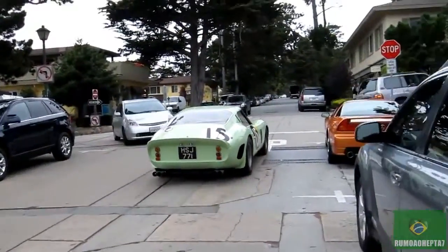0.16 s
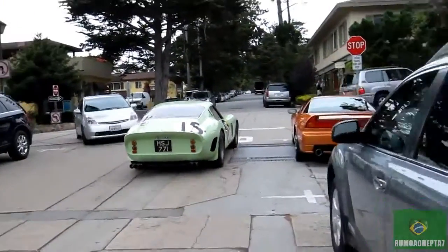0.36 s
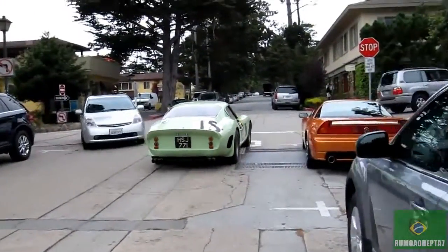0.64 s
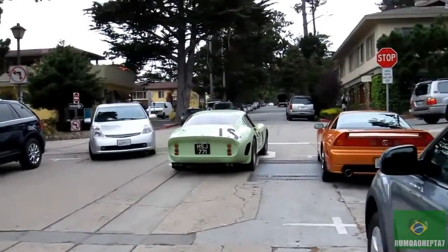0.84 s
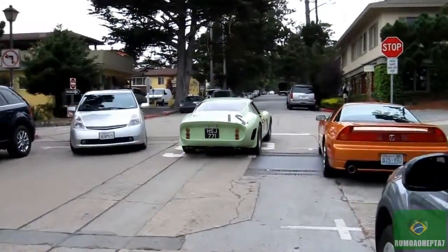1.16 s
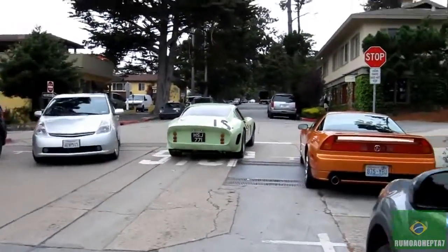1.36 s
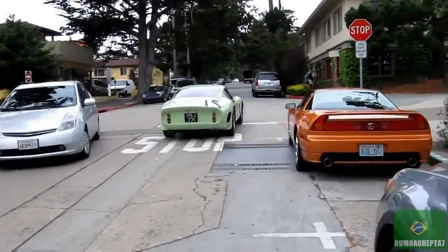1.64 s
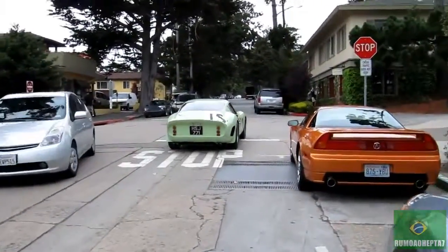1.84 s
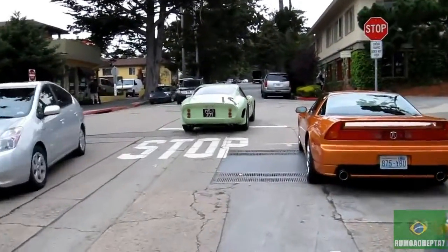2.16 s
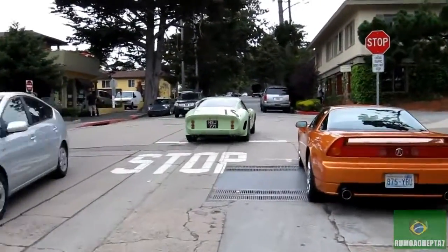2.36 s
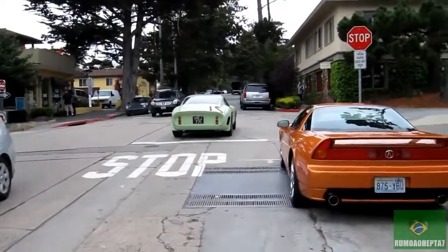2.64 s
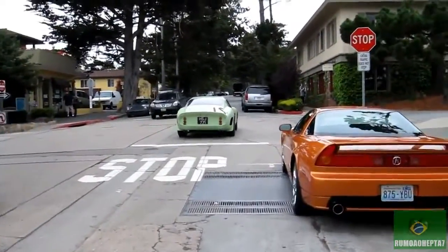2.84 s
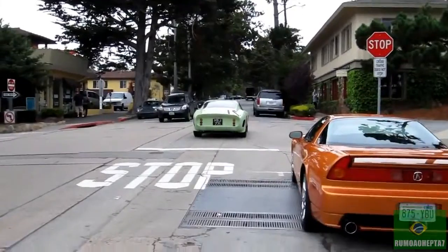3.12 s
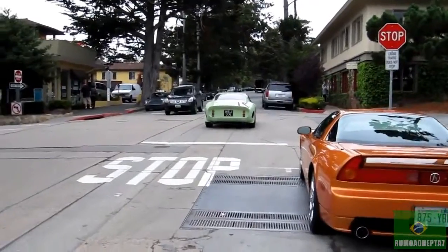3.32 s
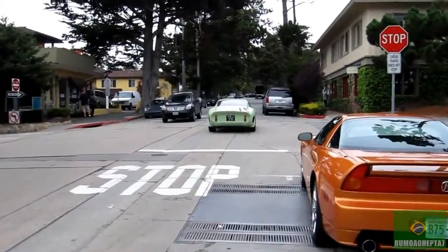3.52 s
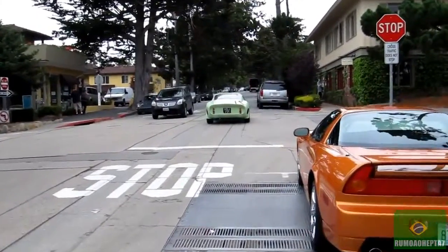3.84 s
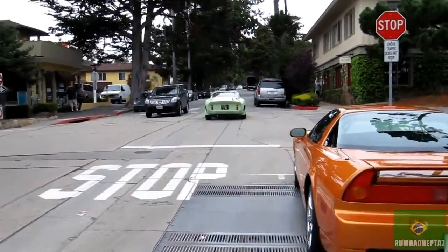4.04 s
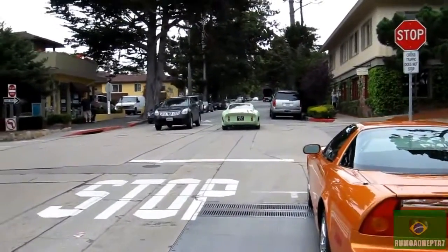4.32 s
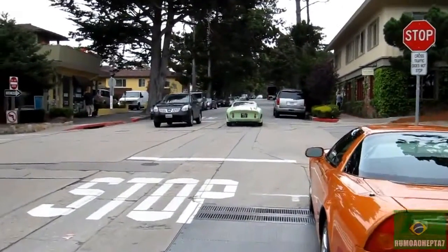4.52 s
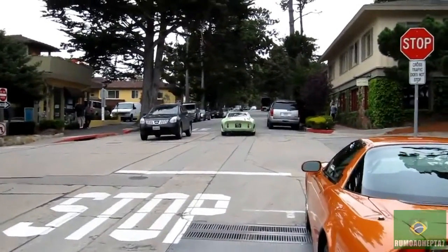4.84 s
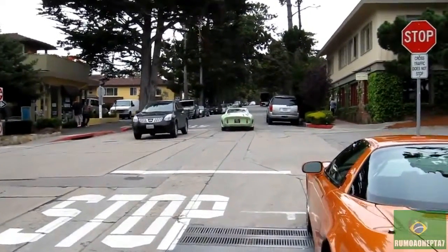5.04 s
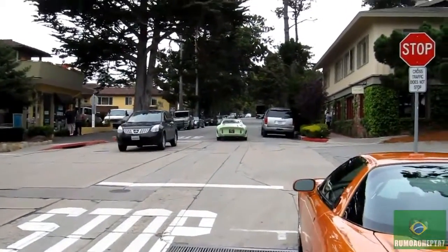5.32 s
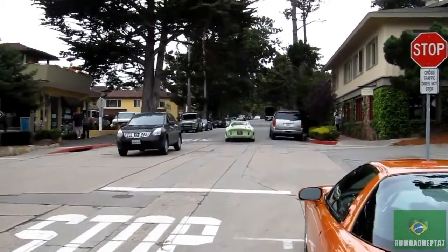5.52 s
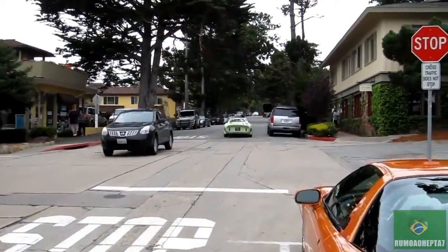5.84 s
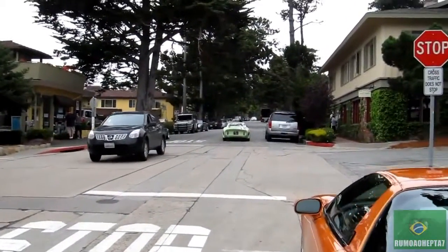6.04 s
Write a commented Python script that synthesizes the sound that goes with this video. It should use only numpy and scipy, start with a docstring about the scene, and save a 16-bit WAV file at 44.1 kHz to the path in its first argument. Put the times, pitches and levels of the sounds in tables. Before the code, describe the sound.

On an open street with traffic hiss, a twelve-cylinder sports car creeps away, its exhaust booming unevenly and rasping, with small pops and sharp dry clicks from the hand-held camera. The revs then climb to a hard, buzzing growl, the throttle shuts with a rush of air and falling pitch, and at the end the engine picks up again with crackling pops. Stereo, from behind the car.

```python
"""A V12 sports car creeps away up a street, with uneven firings booming in the mufflers and rasping in the
tailpipes over the hiss of traffic. Pops and the hand-held camera's handling clicks follow, and gain control
ducks after sharp treble peaks. The car then revs, lifts off with a rush of air and a gear whine, and picks up
again near a thin whistle. Pulses, sines and noise drive the exhaust; coloured noise makes the street and clicks."""
import sys
import numpy as np
from scipy import signal
from scipy.fft import rfft, irfft
from scipy.io import wavfile
from scipy.ndimage import uniform_filter1d

SR = 44100
rng = np.random.default_rng(int(sys.argv[2]) if len(sys.argv) > 2 else 0)


def transcribe(u):
    """Save the signal u as a 16-bit wav file named by the first command-line argument.

    u: samples, shape (n,) or (channels, n), limited to [-1, 1]; the rate is SR.
    q: integer samples, one column per channel.
    """
    v = np.clip(np.atleast_2d(u).T, -1, 1)
    q = np.round(v * 32767).astype(np.int16)
    wavfile.write(sys.argv[1], SR, q)


N = 272516
TIME = np.arange(N) / SR  # s
BINS = np.fft.rfftfreq(N, 1 / SR)  # Hz

# Mean engine speed. Each row: time in seconds, firing rate of one cylinder bank in Hz.
BANK_FIRING_HZ = [(0, 125.4), (.2, 130.3), (.35, 127.5), (.47, 133.8), (.6, 127.8), (.72, 131.7),
                  (1.1, 130.6), (1.4, 126.1), (1.87, 123.5), (1.96, 134.7), (2.1, 126.3), (2.38, 142.3),
                  (2.52, 143.7), (2.63, 150.9), (2.72, 164.3), (2.95, 175.3), (3.1, 192.7), (3.5, 217.8),
                  (3.85, 234.5), (4.17, 241.4), (4.42, 193.1), (4.65, 162.9), (5.27, 136), (5.68, 120.5),
                  (5.89, 163.2), (6.02, 140.7), (6.18, 155.2)]
# Driver and engine state. Each row: start in seconds, glide in seconds, throttle 0-1, muffler boom in dB,
# lope at half the firing rate in dB, clarity of the overtones in dB, drone in dB; levels before trims.
PEDAL_MOVES = [(0, 0.11, 0.54, -20.5, -11, -2, -21), (0.501, 0.43, 0.5, -22, -4, -1, -10),
               (1.35, 0.093, 0.26, -22, 0, -17, -20), (1.86, 0.039, 0.67, -27, 7, 2, -28),
               (2.08, 0.063, 0.68, -25, 5, 1, -20), (2.2, 0.24, 0.99, -26, 7, -0.5, -28),
               (2.62, 0.12, 0.94, -24, 0, 3, -24), (2.95, 0.088, 0.99, -20, -1, -2.5, -35),
               (3.35, 0.16, 0.9, -30.5, 5.5, -13.5, -22), (3.75, 0.11, 1, -22, -4, -3.5, -11),
               (4.17, 0.086, 0.15, -22.5, 10, -12, -21), (4.28, 0.089, 0.05, -29, -5, 1, -20),
               (4.58, 0.12, 0, -25.5, -12, -2, -10), (4.97, 0.16, 0, -25.5, -4, -8.5, 1),
               (5.25, 0.056, 0, -25, -5, -4, -6.5), (5.63, 0.19, 1, -20.5, 6, -9.5, -2)]
# Strength of the twelve firings of one engine cycle. One column: signed factor.
CYLINDER_STRENGTH = [0.25, -0.29, 0.68, 0.89, -0.22, 0.23, 0.2, 0.41, -0.33, -0.36, 0.36, 0.014]
# Overtones of the note. Each row: multiple of the bank firing rate, muffler level in dB, tailpipe level in dB.
OVERTONES = [(1 / 2, -1, -9), (3 / 2, -10.5, -17), (2, -2, -5), (3, -28, -5.5)]
# Resonances that pick out an overtone as it sweeps by. Each row: frequency in Hz, gain in dB.
OVERTONE_GAIN_DB = [(60, -24), (110, -3), (122, 8.5), (200, -8), (270, 0), (305, -6), (338, 3), (375, -11),
                    (425, 5), (450, 2.5), (480, -6), (535, -9), (700, -28)]
# Main tailpipe mode. One row: frequency in Hz, width in Hz, gain in dB.
PIPE_MODE = (450, 24, 10)
# Exhaust tuning. Each row: bank firing rate in Hz, note level at full throttle in dB.
NOTE_TUNING_DB = [(118, -17), (128, -10), (136, -13.5), (146, -17), (166, -14.5), (178, -19), (204, -14.5),
                  (220, -11.5), (229, -15), (242, -22.5)]
# Dips and surges of the note. Each row: centre in seconds, half length in seconds, change in dB.
NOTE_SURGES = [(1.887, 0.021, -12), (2.37, 0.2, -4), (2.534, 0.027, 4.5), (3.612, 0.02, 2),
               (3.905, 0.082, -9), (4.003, 0.019, 4.5), (4.296, 0.11, -15), (4.43, 0.054, 13),
               (4.547, 0.021, 9), (4.61, 0.0087, 10), (5.688, 0.066, -7)]
# Muffler resonance. Each row: frequency in Hz, gain in dB.
MUFFLER_DB = [(25, -29.5), (50, -26), (68, -8), (100, -20), (150, -15), (172, -5), (195, -3.5), (218, 2.5),
              (260, -12.5), (310, -12), (380, -29), (435, -9), (490, -21.5), (600, -46), (1500, -64),
              (8000, -100)]
# Tailpipe body. Each row: frequency in Hz, gain in dB.
PIPE_BODY_DB = [(40, -21.5), (85, -13), (125, 9), (180, -4), (260, -2.5), (335, 3), (380, -8), (435, 4),
                (490, -3), (530, -3.5), (580, -14), (690, -20.5), (900, -20.5), (2000, -46.5), (8000, -87)]
# Tailpipe ring on a light throttle. Each row: frequency in Hz, gain in dB.
PIPE_SOFT_DB = [(200, -17.5), (380, -3.5), (440, 10), (520, -7.5), (680, -22.5), (780, -11), (1000, 0.5),
                (1120, -9.5), (1285, 5), (1400, 0), (1600, -13), (1950, -21.5), (2350, -7.5), (3000, -21),
                (9000, -26), (16000, -82)]
# Tailpipe ring on an open throttle. Each row: frequency in Hz, gain in dB.
PIPE_RASP_DB = [(200, -24.5), (500, 4), (690, -2.5), (780, 3.5), (950, -1.5), (1130, -7.5), (1330, 5),
                (1620, -1.5), (1950, -9), (2350, -3.5), (2950, -18.5), (4200, -29), (9000, -34),
                (16000, -71)]
# Metallic tailpipe buzz under load. Each row: frequency in Hz, gain in dB.
BUZZ_COLOUR_DB = [(1000, -30), (2000, -12.5), (2350, -7), (2900, -7.5), (3400, 6.5), (3900, -6.5),
                  (4700, -4.5), (6000, -15), (9000, -18), (16000, -44)]
# Standing waves in the exhaust. Each row: frequency in Hz, dB with the throttle shut, dB at full throttle.
DRONE_MODES = [(207.7, -27, -24.5), (435, -53, -31.5), (522, -49, -38)]
# Street wash. Each row: frequency in Hz, gain in dB.
WASH_COLOUR_DB = [(20, -2), (60, 20.5), (200, 24.5), (600, 12.5), (1000, 12), (1800, 7.5), (3000, 6.5),
                  (4500, 1.5), (7000, -2.5), (9000, -27), (15000, -21)]
# Wash treble from all sides. Each row: frequency in Hz, gain in dB.
DIFFUSE_COLOUR_DB = [(100, -12), (1200, -6.5), (3000, 2.0), (7000, -3.5), (10000, -46), (15000, -29)]
# Breeze at the microphones. Each row: frequency in Hz, gain in dB.
BREEZE_COLOUR_DB = [(10, -10), (30, 4), (70, 21), (200, -15), (1000, -50)]
# High sizzle. Each row: frequency in Hz, gain in dB.
SIZZLE_COLOUR_DB = [(3000, -49), (7000, -1.5), (9000, 4), (10000, 7.5), (11500, 1), (14000, -4),
                    (16000, -38)]
# Sizzle over time. Each row: time in seconds, level before trims in dB.
SIZZLE_LEVEL_DB = [(0, -58.5), (1.3, -60), (1.6, -60.5), (2.0, -57.5), (2.55, -56), (2.8, -51.5),
                   (3.7, -55), (4.3, -48), (4.6, -55.5), (5.65, -58), (6.18, -50.5)]
# Hard firings. Each row: start in seconds, level before colour and trim in dB, bright ring against thud in dB.
POP_EVENTS = [(.384, -24, -4), (0.475, -31, 1), (.661, -26, 1.5), (.94, -32, 2), (1.933, -20.5, -3),
              (4.849, -35, 6), (5.417, -24.5, -20), (5.673, -34, 7), (5.766, -24.5, 4), (5.791, -26, 2),
              (5.922, -26, -1), (6.111, -28.5, 3), (6.128, -29, 4), (6.162, -27.5, 4.5)]
# Dull thud of a pop. Each row: frequency in Hz, gain in dB.
POP_THUD_DB = [(100, -20), (300, -1), (440, 8), (600, 4), (850, 2.5), (1100, -9), (1700, -16), (2300, -11),
               (4000, -17), (16000, -63)]
# Bright ring of a pop. Each row: frequency in Hz, gain in dB.
POP_RING_DB = [(600, -32), (1100, -5.5), (1250, 11.5), (1420, 12), (1600, -4), (2000, -18), (8000, -48)]
# Handling clicks. Each row: start in seconds, level before colour in dB, rise in seconds, decay in seconds,
# brightness in dB per octave above 3 kHz.
CLICK_EVENTS = [(.532, -20, 0.00023, 0.0014, 6), (0.7414, -21.5, 0.00016, 0.006, 4.5),
                (0.8602, -30.5, 0.00018, 0.0016, -2), (1.3271, -6, 0.000097, 0.0021, 4.5),
                (1.806, -31, 0.00012, 0.0023, -2), (1.8408, -25.5, 0.0003, 0.0011, 6),
                (2.031, -25, 0.0053, 0.0047, 1.5), (2.0543, -6.5, 0.0001, 0.0011, 3),
                (2.055, -11.5, 0.00082, 0.0029, -1), (2.477, -28, 0.0002, 0.002, 2)]
# Click colour. Each row: frequency in Hz, gain in dB.
CLICK_COLOUR_DB = [(100, 25), (400, 7), (900, 6), (2200, 0.5), (3500, 1.5), (5000, 6), (6800, 7),
                   (9000, -3), (10500, 3.5), (12500, -5), (16000, -9)]
# Camera housing modes, rung by every click. Each row: frequency in Hz, gain in dB, decay in seconds.
HOUSING_MODES = [(910, -11.5, 0.0026), (2210, -15.5, .003), (3600, -13, 0.0027)]
# Engine stumbles. Each row: centre in seconds, half length in seconds, low sound in dB, rasp in dB.
STUMBLE_EVENTS = [(1.855, 0.0092, -2, -6), (2.406, 0.0068, -4, -2), (2.495, 0.013, -2.5, -7),
                  (2.654, 0.005, -13, -3), (2.798, .01, 1, 1.5), (2.964, 0.0069, -1.5, 2.5),
                  (3.022, .015, -2.5, 2), (3.193, 0.017, -3, -2.5), (3.679, 0.015, -4.5, -2.5),
                  (4.362, 0.023, -3.5, -6), (4.59, 0.0095, -12, -2), (4.815, 0.015, -4, -14),
                  (5.626, 0.016, -5, 1), (5.821, 0.017, -9, -5), (5.986, 0.0081, -5, -10)]
# Rush of air as the throttle shuts. One row: peak in seconds, peak level in dB, fade to either side in dB per s.
RUSH_SWELL = (4.27, -38, 52)
# Rush colour. Each row: frequency in Hz, gain in dB.
RUSH_COLOUR_DB = [(500, -23), (1500, -4), (3500, 6), (5500, 7), (8000, -18), (16000, -21)]
# Gear whine on the overrun. One row: peak in seconds, peak level in dB, fade to either side in dB per second.
WHINE_SWELL = (4.72, -48, 22)
# Thin high whistle. One row: peak in seconds, peak level in dB, fade to either side in dB per second.
WHISTLE_SWELL = (5.55, -57.5, 11)

START_M, SPEED_M_PER_S, ACCEL_M_PER_S2 = 8.9, 1.6, 0.41  # the car's path away from the camera
LOSS_DB_PER_DOUBLING = 1.5  # the street channels the low sound
SIZZLE_DULLING_DB = 10  # the sizzle's top dulls as time passes, on the same curve as doublings()
NOTE_THROTTLE_DB = 15  # lost when the throttle shuts
RASP_SHUT_DB, RASP_THROTTLE_DB = -39.5, 12  # before trims; what full throttle adds
EVEN_TRADE_DB_PER_DB = 0.3  # pipe noise lost as even firing lifts the overtones
LUMP_DB, LUMP_FIRINGS = 1, 9.7  # creeping, the engine throbs about once in so many firings of a bank
CRACK_DB = -2.5  # sharp front of each firing against its turbulent puff
REPEAT_SHARE = 0.21  # power share of gas noise that repeats every engine cycle
FLUTTER_DB, FLUTTER_HZ = 1.5, 40  # drive and rate of the uneven bursts of rasp
# the buzz stands out more as the car gets further up the street
BUZZ_SHUT_DB, BUZZ_THROTTLE_DB, BUZZ_DB_PER_DOUBLING = -66, 13, 6.5
WASH_BASE_DB, WASH_DB_PER_OCTAVE = -44, 2.5  # before trim; rise with engine speed
POP_DECAY_S = 0.0039
EDGE_HZ = 16200


def amp(db):
    """Decibels to gain."""
    return 10 ** (np.asarray(db) / 20)


def unit(x):
    """Scales to rms 1."""
    return x / np.sqrt(np.mean(x ** 2) + 1e-20)


def read(points, hz):
    """Level of a spectrum at the given frequencies, dB."""
    point_hz, db = np.transpose(points)
    return np.interp(np.log(hz + 1), np.log(point_hz), db)


def curves(rows):
    """Each column of a table as a curve over time."""
    s, *columns = np.transpose(rows)
    return [np.interp(TIME, s, column) for column in columns]


def colour(x, points):
    """Causal (minimum-phase) filter with the given spectrum: each pulse rings after it lands."""
    log_gain = np.log(amp(read(points, BINS)))
    mirrored = np.r_[log_gain, log_gain[-2:0:-1]]
    phase = -signal.hilbert(mirrored).imag[:len(BINS)]
    return irfft(rfft(x) * np.exp(log_gain + 1j * phase), N)


def waver(rate_hz):
    """Slow random motion of rms 1."""
    return unit(irfft(rfft(rng.standard_normal(N)) * np.exp(-(BINS / rate_hz) ** 2), N))


def pair(side_db):
    """White noise at two microphones, partly shared."""
    mid, side = rng.standard_normal((2, N))
    return np.array([mid + amp(side_db) * side, mid - amp(side_db) * side])


def swell(s, peak_db, fade_db_per_s):
    """Gain of a sound that grows to a peak and fades again."""
    return amp(peak_db - fade_db_per_s * abs(TIME - s))


def doublings():
    """How many times the distance has doubled as the car gathers speed."""
    travelled_m = SPEED_M_PER_S * TIME + ACCEL_M_PER_S2 * TIME ** 2 / 2
    return np.log2(1 + travelled_m / START_M)


def pedal():
    """Throttle, boom, lope, clarity and drone over time: each move glides to its new state and stays there."""
    moves = np.array(PEDAL_MOVES)
    state = moves[0, 2:, None] * np.ones(N)
    for (s, glide_s), step in zip(moves[1:, :2], np.diff(moves[:, 2:], axis=0)):
        state = state + step[:, None] * np.clip((TIME - s) / glide_s, 0, 1)
    return np.clip(state[0], 0, 1), *state[1:]


def note_level(hz, throttle):
    """The note follows the throttle and the exhaust's tuning, with brief dips and surges, dB."""
    surges_db = sum(db * np.exp(-((TIME - s) / half_s) ** 2) for s, half_s, db in NOTE_SURGES)
    return read(NOTE_TUNING_DB, hz) + NOTE_THROTTLE_DB * (np.sqrt(throttle) - 1) + surges_db


def exhaust_note(hz, turns, note_db, boom_db, rasp_db, lope_db, clarity_db):
    """The steady part of the firing: a strong fundamental and overtones that swell in the resonances."""
    flutter = 0.091 + 0.37 / (1 + amp(note_db + 26.5) ** 2)  # the weak note stumbles more
    note = amp(note_db) * np.sin(2 * np.pi * turns) * (1 + flutter * waver(rate_hz=21))
    mode_hz, width_hz, mode_db = PIPE_MODE
    even = np.clip(0.5 + clarity_db / 2, 0, 1)  # only even firing builds up the pipes' mode
    for multiple, muffler_db, pipe_db in OVERTONES:
        line_hz = multiple * hz
        ring_db = even * mode_db / (1 + ((line_hz - mode_hz) / (width_hz / 2)) ** 2)
        in_muffler = amp(boom_db + muffler_db + read(MUFFLER_DB, line_hz))
        in_pipe = amp(rasp_db + pipe_db + read(OVERTONE_GAIN_DB, line_hz) + ring_db)
        line_db = lope_db if multiple < 1 else clarity_db
        line = amp(line_db) * np.sin(2 * np.pi * (multiple * turns + rng.random()))
        note += np.hypot(in_muffler, in_pipe) * line * (1 + 0.36 * waver(rate_hz=29.0))
    return np.sqrt(2) * note


def firings(turns, pattern, scatter, slip_s, other_bank):
    """One pulse for each firing, two banks in turn; what sounds is how each departs from the mean."""
    at = np.flatnonzero(np.diff(np.floor(2 * turns)) > 0)
    chance, late = rng.standard_normal((len(at), 2)).T
    size = pattern[at] * np.resize(CYLINDER_STRENGTH, len(at)) + scatter * np.tanh(chance)
    landing = np.clip(at + np.round(late * slip_s * SR).astype(int), 0, N - 1)
    pulses = np.zeros(N)
    pulses[landing] = size * np.resize([1, other_bank], len(at))
    return pulses


def turbulence(turns, size=1024):
    """Gas noise, partly fresh and partly repeating with the engine cycle, so its grain glides with the revs."""
    cycle = np.interp(turns / 6, np.arange(size) / size, rng.standard_normal(size), period=1)
    return np.sqrt(REPEAT_SHARE) * unit(cycle) + np.sqrt(1 - REPEAT_SHARE) * rng.standard_normal(N)


def tailpipe_gas(turns, pulses):
    """Each firing lets out a sharp front and a short turbulent puff, the strong ones more."""
    puffs = unit(signal.lfilter([1], [1, -np.exp(-1 / (0.002 * SR))], abs(pulses) ** 0.45))
    fronts = np.sqrt(np.sqrt(abs(pulses)))  # nearly alike from firing to firing
    throb = 1 + 0.23 * np.cos(2 * np.pi * turns)  # one bank is the louder
    gas = throb * (unit((0.47 + puffs) * turbulence(turns)) + amp(CRACK_DB) * unit(fronts))
    return gas * unit(amp(FLUTTER_DB * np.tanh(waver(rate_hz=FLUTTER_HZ)) * 2))


def tailpipe_rasp(gas, throttle, rasp_db):
    """Gas rings the pipes; the rasp broadens and brightens as the throttle opens."""
    wide = np.clip((throttle - .5) / 0.22, 0, 1)
    mix = wide * unit(colour(gas, PIPE_RASP_DB)) + (1 - wide) * unit(colour(gas, PIPE_SOFT_DB))
    return amp(rasp_db - 1.75) * mix


def buzz(gas, throttle):
    """Metallic tailpipe buzz driven by the gas, louder under load."""
    level_db = BUZZ_SHUT_DB + BUZZ_THROTTLE_DB * throttle + BUZZ_DB_PER_DOUBLING * doublings()
    return amp(level_db) * unit(colour(gas, BUZZ_COLOUR_DB))


def drone(throttle, drone_db):
    """Standing waves in mufflers and pipes hold their pitch whatever the engine speed."""
    out = np.zeros(N)
    for hz, shut_db, open_db in DRONE_MODES:
        level_db = drone_db + shut_db + (open_db - shut_db) * throttle
        level = amp(level_db) * (1 + 0.5 * waver(rate_hz=7.9))
        out += level * np.sqrt(2) * np.sin(2 * np.pi * hz * TIME + 0.96 * waver(rate_hz=13.0))
    return out


def exhaust():
    """Note, boom, body, whine, gas and buzz share one engine phase; drone pitches and pop times are fixed."""
    hz = curves(BANK_FIRING_HZ)[0] * (1 + .005 * waver(rate_hz=10))  # the engine hunts a little
    turns = np.cumsum(hz) / SR  # firings of one bank
    throttle, boom_db, lope_db, clarity_db, drone_db = pedal()
    loss_db = LOSS_DB_PER_DOUBLING * doublings()
    note_db = note_level(hz, throttle) - loss_db
    creeping = np.exp(-((throttle - .38) / 0.56) ** 2)
    lump_db = LUMP_DB * creeping * np.cos(2 * np.pi * turns / LUMP_FIRINGS + 1.2 * waver(rate_hz=2.4))
    boom_db = boom_db - loss_db + lump_db + 0.53 * waver(rate_hz=10.0)
    rasp_db = RASP_SHUT_DB + RASP_THROTTLE_DB * throttle - loss_db + 0.59 * lump_db + 0.27 * waver(rate_hz=66)

    note = exhaust_note(hz, turns, note_db, boom_db, rasp_db, lope_db, clarity_db)
    pulses = firings(turns, amp(clarity_db / 2), scatter=1.29, slip_s=.00018, other_bank=0.87) / np.sqrt(hz)
    boom = amp(boom_db - 3.5) * unit(colour(pulses, MUFFLER_DB))
    body_db = rasp_db + 3.0 - EVEN_TRADE_DB_PER_DB * np.maximum(clarity_db, 0)
    body = amp(body_db) * unit(colour(pulses, PIPE_BODY_DB))
    gas = tailpipe_gas(turns, pulses)
    low_gain, rasp_gain = stumbles()
    low = low_gain * (note + boom + body + drone(throttle, drone_db)) + gear_whine(turns)
    rasp = rasp_gain * (tailpipe_rasp(gas, throttle, rasp_db) + buzz(gas, throttle)) + pops()
    return low, rasp


def traffic_wash():
    """Noise of tyres and traffic, with the engine's mechanical hiss rising with engine speed; extra treble
    arrives from all sides."""
    hz = curves(BANK_FIRING_HZ)[0]
    wash_db = WASH_BASE_DB + WASH_DB_PER_OCTAVE * np.log2(hz / hz[0])
    wash = colour(pair(side_db=-21), WASH_COLOUR_DB)
    diffuse = colour(rng.standard_normal(N), DIFFUSE_COLOUR_DB)
    return amp(wash_db + 8.5) * unit(wash + np.array([diffuse, -diffuse]))


def high_sizzle():
    """Flickering treble noise whose top grows duller as time passes."""
    flicker = 1 + 0.11 * waver(rate_hz=87)
    noise = unit(colour(pair(side_db=-1.5) * flicker, SIZZLE_COLOUR_DB))
    sizzle = amp(curves(SIZZLE_LEVEL_DB)[0] + 4.0) * noise
    top = irfft(rfft(sizzle) * np.clip((BINS - 10500) / 2000, 0, 1), N)
    top_gain = amp(9.5 - SIZZLE_DULLING_DB * doublings())
    return (sizzle + (top_gain - 1) * top) * amp([[.7], [-.7]])


def breeze():
    """Low noise of moving air, mostly separate at each microphone."""
    return amp(-62) * unit(colour(pair(side_db=6), BREEZE_COLOUR_DB))


def housefronts(x, t60_s, wet_db):
    """Scattered echoes from houses and parked cars, different at each microphone."""
    t = np.arange(SR // 2) / SR
    sparse = rng.standard_normal((2, len(t))) * (rng.random((2, len(t))) < .03)
    taps = sparse * (t > .008) * amp(-60 * t / t60_s)
    taps /= np.linalg.norm(taps, axis=1, keepdims=True)
    return amp(wet_db) * signal.fftconvolve(np.atleast_2d(x), taps, axes=1)[:, :N]


def pops():
    """A hard firing now and then: a short burst of gas that thuds and rings in the tailpipes."""
    t = np.arange(1024) / SR
    thud, ring = out = np.zeros((2, N + len(t)))
    for s, db, ring_db in POP_EVENTS:
        start = round(s * SR)
        burst = np.exp(-t / POP_DECAY_S) * rng.standard_normal(len(t))
        out[:, start:start + len(t)] += amp([[db], [db + ring_db]]) * burst
    return amp(7) * (colour(thud[:N], POP_THUD_DB) + colour(ring[:N], POP_RING_DB))


def handling():
    """Short dry snaps, nearer the left microphone, that knock the camera's housing modes."""
    snaps, knocks = np.zeros((2, N)), np.zeros(N)
    t = np.arange(2048) / SR
    knock = sum(amp(db) * np.exp(-t / decay_s) * np.sin(2 * np.pi * hz * t) for hz, db, decay_s in HOUSING_MODES)
    octaves = np.log2(np.maximum(np.fft.rfftfreq(len(t), 1 / SR), 3000) / 7000)
    for s, db, rise_s, decay_s, bright_db in CLICK_EVENTS:
        envelope = (1 - np.exp(-t / rise_s)) * np.exp(-t / decay_s)
        burst = rng.standard_normal((2, len(t))) * envelope
        snap = irfft(rfft(burst) * amp(bright_db * octaves))
        start = round(s * SR)
        snaps[:, start:start + len(t)] += amp(db) * unit(snap) * np.sqrt(np.mean(envelope ** 2)) / envelope.max()
        knocks[start:start + len(t)] += amp(db) * knock
    return colour(snaps, CLICK_COLOUR_DB) * amp([[3], [-2]]) + knocks


def stumbles():
    """The engine stumbles for a few firings: brief level changes of low sound and rasp, as gains."""
    change_db = np.zeros((2, N))
    for s, half_s, low_db, rasp_db in STUMBLE_EVENTS:
        change_db += np.outer([low_db, rasp_db], np.exp(-((TIME - s) / half_s) ** 2))
    return amp(change_db)


def rush():
    """Hiss of air that swells around the lift-off and arrives from all sides."""
    return swell(*RUSH_SWELL) * unit(colour(pair(side_db=1.5), RUSH_COLOUR_DB))


def gear_whine(turns):
    """A sine at a fixed multiple of the bank firing rate, its phase wavering."""
    return swell(*WHINE_SWELL) * np.sqrt(2) * np.sin(2 * np.pi * 9.45 * turns + 1.4 * waver(rate_hz=23))


def whistle():
    """Noise through a narrow resonance at 10080 Hz."""
    resonance = 1 / (1 + ((BINS - 10080) / 130) ** 2)
    return swell(*WHISTLE_SWELL) * unit(irfft(rfft(pair(side_db=-5)) * resonance, N))


def scene():
    """The car, its echoes, the street and the camera's own clicks."""
    low, rasp = exhaust()
    car = low * amp([[-.25], [.25]]) + rasp * amp([[-.55], [.55]])
    echoes = housefronts(low, t60_s=0.36, wet_db=-28) + housefronts(rasp, t60_s=0.17, wet_db=-13.0)
    street = traffic_wash() + high_sizzle() + breeze() + whistle()
    return car + echoes + street + handling() + rush()


def record(dry):
    """Gain control that reacts to sharp treble peaks, overload, a notch in the response, and the band limit."""
    treble = signal.sosfilt(signal.butter(2, 4000, "high", fs=SR, output="sos"), dry)
    power = uniform_filter1d((treble ** 2).mean(0), size=88)
    peak_db = 10 * np.log10(abs(power) + 1e-12)
    recovery_db = 9 * TIME
    wanted_db = np.clip(0.34 * (peak_db + 27.5), 0, 6.7)
    duck_db = np.maximum.accumulate(wanted_db + recovery_db) - recovery_db
    # the gain takes a moment to fall; the unequal constants deepen a steady duck by 12 %
    duck_db = signal.lfilter([1 / (0.0017 * SR)], [1, 1 / (0.0019 * SR) - 1], duck_db)
    overloaded = np.clip(dry * amp(-duck_db), -.62, .62)
    notch = 1 - 0.99 * np.exp(-((BINS - 8250) / 400) ** 2)
    notched = irfft(rfft(overloaded) * notch, N)
    band_limit = signal.firwin(511, EDGE_HZ, window=("kaiser", 9), fs=SR)
    return signal.oaconvolve(notched, band_limit[None], "same")


dry = scene()
out = record(dry)
transcribe(out)
```